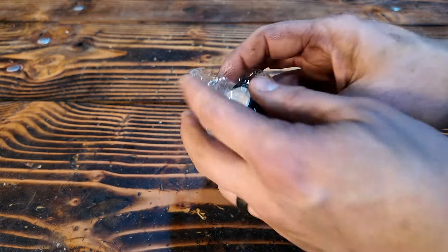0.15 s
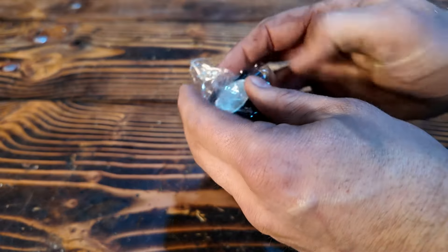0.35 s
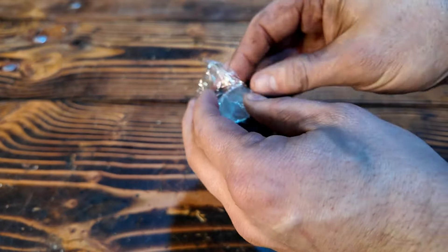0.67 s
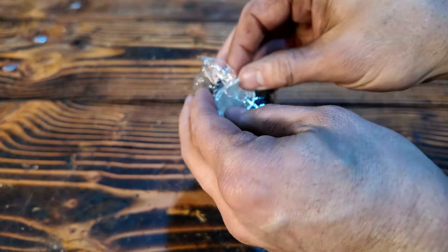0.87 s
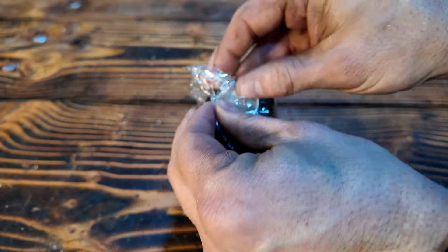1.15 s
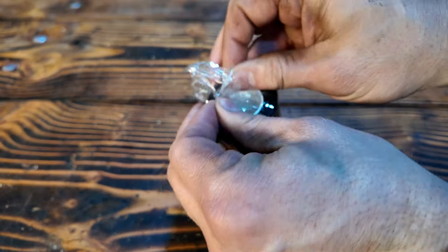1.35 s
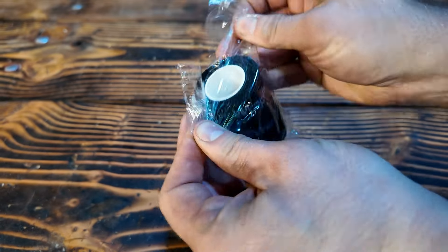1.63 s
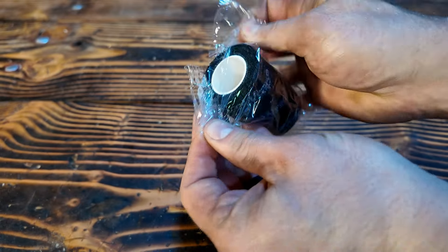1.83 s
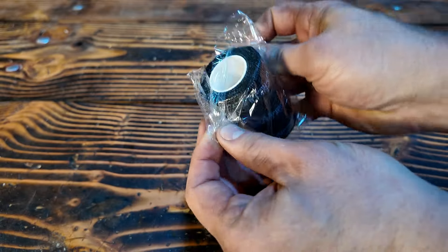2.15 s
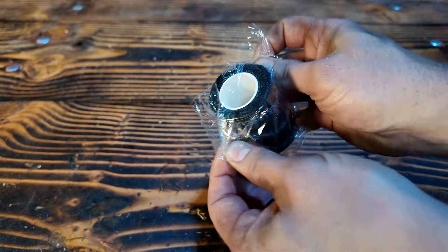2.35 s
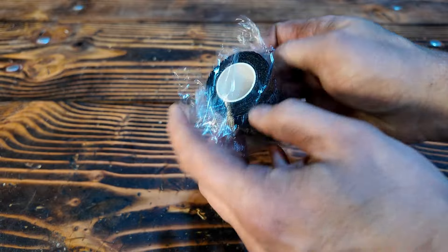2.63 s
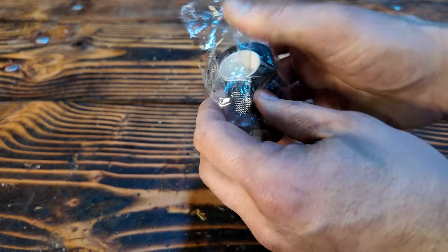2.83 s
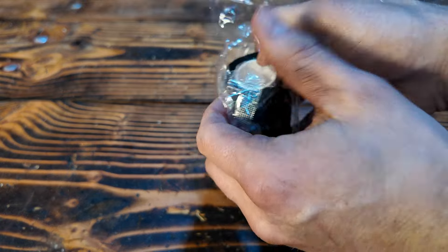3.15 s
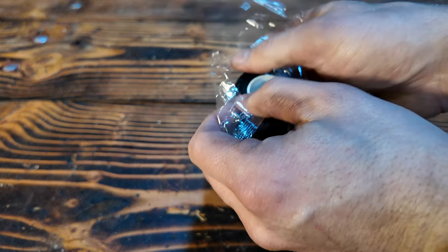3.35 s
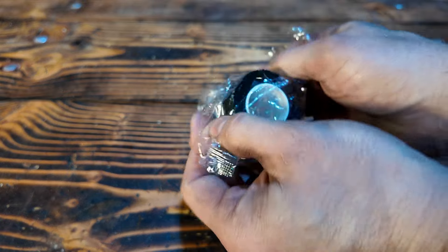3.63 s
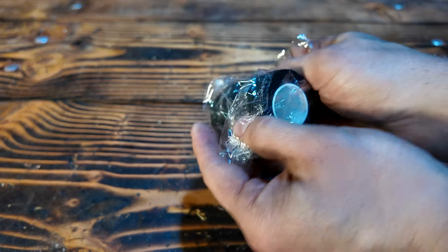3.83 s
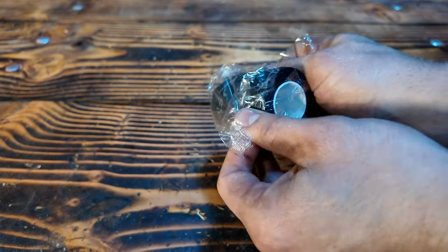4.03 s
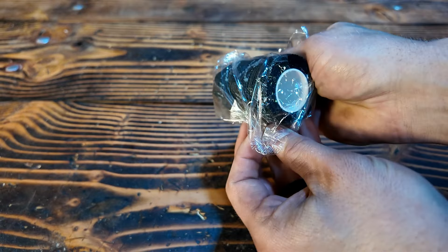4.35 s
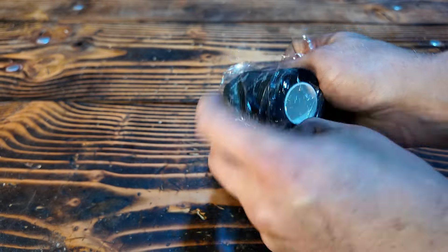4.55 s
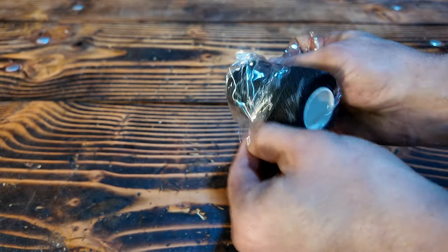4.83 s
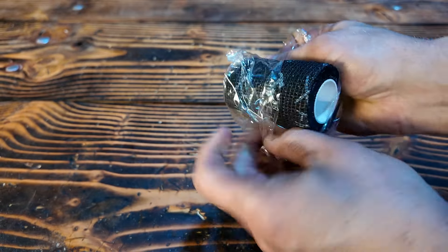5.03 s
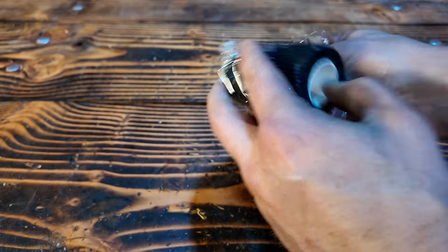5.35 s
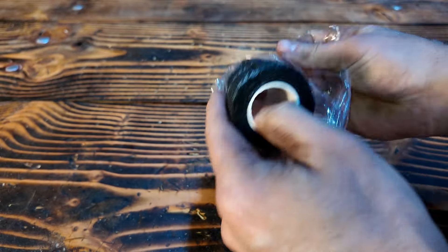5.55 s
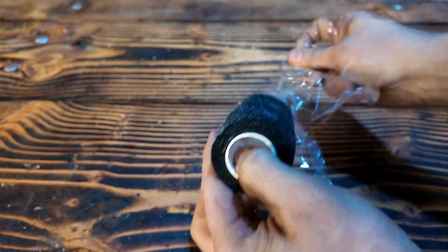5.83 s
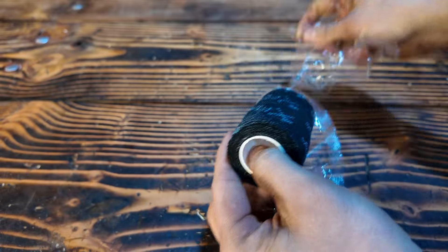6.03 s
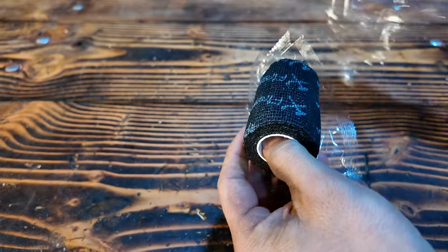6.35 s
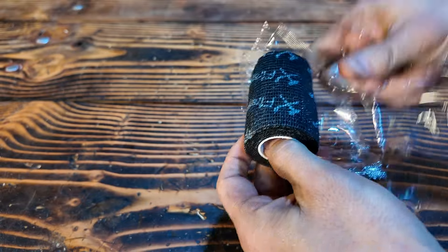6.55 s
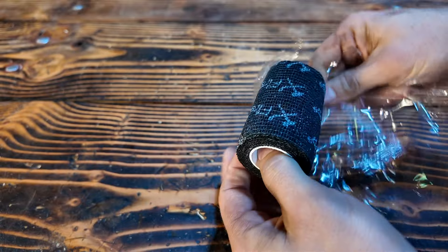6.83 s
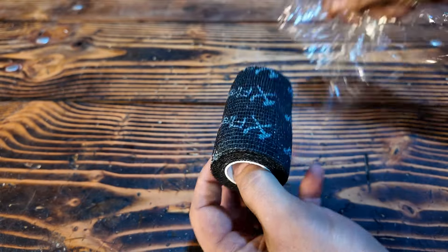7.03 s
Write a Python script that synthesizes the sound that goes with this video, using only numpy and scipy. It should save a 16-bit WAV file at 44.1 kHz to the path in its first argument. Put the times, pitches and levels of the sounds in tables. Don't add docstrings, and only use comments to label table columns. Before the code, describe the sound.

Very close stereo sound of fingers removing thin, stiff clear plastic from a small tape roll at a wooden table. From 0 to 1.4 seconds the open end is picked at: bright, dry ticks and short clustered crackles, with uneven gaps. Around 1.45 a much stronger crinkle breaks out with a brief rub, and loud snaps crowd together near 1.6 to 1.8. Peeling continues in smaller bursts until about 3.3, softening towards the end. From 3.6 to 5.6 crackling is livelier and brighter as film unwinds in repeated tugs. At 5.65 to 6.25 the sleeve pulls off with fuller, hollower crumples and faint low sliding friction. Afterwards light rustling and a few stronger crinkles near 6.7 to 6.9 drift right, dying away by 7.1. The room adds a short dull reverberation; quiet low ventilation rumble runs throughout.

```python
import sys
import numpy as np
from scipy import signal
from scipy.fft import rfft, irfft
from scipy.io import wavfile

SR = 44100
rng = np.random.default_rng(int(sys.argv[2]) if len(sys.argv) > 2 else 0)


def gain_from_decibels(decibels):
    exponent = np.asarray(decibels, float) / 20
    return 10 ** exponent


def pcm_store(signal):
    levels = np.round(np.clip(np.atleast_2d(signal), -1, 1) * 32767)
    wavfile.write(sys.argv[1], SR, levels.astype(np.int16).T)


N = 316715

# [t/s, peak level/dB, crease f/Hz]
CREASE_SNAPS = [(0.002, -23, 3360), (0.01, -37, 2760), (0.0153, -25.5, 7120), (0.027, -29, 1000),
                (0.0313, -32.5, 7610), (0.0461, -27, 7120), (0.0551, -27.5, 5430), (0.068, -35.5, 7120),
                (0.1003, -27, 2410), (0.1028, -23, 8150), (0.1154, -23, 4740), (0.1255, -26, 4140),
                (0.139, -25, 1140), (0.16, -22, 7120), (0.1706, -23, 1130), (0.1994, -30, 4740),
                (0.214, -28, 5430), (0.2215, -27, 3620), (0.2321, -30.5, 5810), (0.2425, -29, 8720),
                (0.2498, -16, 9330), (0.2617, -16, 2110), (0.2705, -27, 6220), (0.2844, -28, 4740),
                (0.3034, -29.0, 4430), (0.306, -23, 5430), (0.3185, -31, 5430), (0.3266, -22, 5430),
                (0.3354, -19, 4140), (0.3406, -17.5, 3870), (0.3623, -15.5, 4430), (0.397, -27, 4430),
                (0.4348, -21.5, 8150), (0.4399, -22, 3870), (0.457, -33.0, 1500), (0.472, -27.5, 4140),
                (0.4832, -27, 4140), (0.4929, -29, 1140), (0.5059, -36, 8720), (0.508, -34.5, 4140),
                (0.513, -35.0, 3380), (0.5207, -36, 4140), (0.5245, -37, 3380), (0.5408, -30, 3380),
                (0.5462, -28, 3620), (0.5514, -29, 4140),
                (0.5632, -29.5, 13080), (0.5758, -24, 6220), (0.5801, -23.5, 2110), (0.588, -25, 4740),
             (0.6068, -23, 1140), (0.6248, -29, 9330), (0.634, -16.5, 3870), (0.6439, -28, 1000),
             (0.667, -28, 9330), (0.7094, -23, 11430), (0.716, -27, 1230), (0.75, -32, 5070),
             (0.755, -32, 4430), (0.768, -31, 5070), (0.8027, -27, 1000), (0.807, -25, 2410),
             (0.822, -32.5, 2410), (0.8794, -26, 2250), (0.919, -37.0, 2250), (0.941, -32, 11430),
             (0.9506, -28, 3870), (0.9607, -33, 12230), (0.9749, -27, 9330), (1, -31.5, 3380),
             (1.013, -29, 3380), (1.0214, -28, 6650), (1.0328, -33, 6650), (1.0417, -25, 3380),
             (1.0865, -16.5, 4430), (1.0965, -27, 2250), (1.1105, -22.5, 10680), (1.1223, -23.0, 3870),
             (1.1276, -19, 3380), (1.1413, -18, 3380), (1.1893, -20, 1140), (1.2421, -15, 2110),
             (1.2465, -21.5, 5430), (1.2705, -24, 1140), (1.3061, -31, 4200), (1.3148, -19.0, 8100),
             (1.3197, -18.5, 9980), (1.3548, -16, 1140), (1.357, -31, 8720), (1.3868, -26.0, 9980),
             (1.397, -19, 8720), (1.407, -22, 5810),
                (1.463, -19, 9330), (1.4711, -24, 3620), (1.491, -20, 5430), (1.601, -16, 3870),
              (1.6153, -26, 8720), (1.6262, -16, 4430), (1.6312, -15.5, 6220), (1.6405, -15, 3580),
              (1.6524, -11, 2580), (1.6571, -13, 6220), (1.6826, -11, 4740), (1.7118, -15.5, 4740),
              (1.738, -15, 4430), (1.7626, -19.0, 7120), (1.7738, -24.5, 3870), (1.8298, -18.5, 2250),
              (1.8986, -29, 6650), (1.909, -33, 3620), (1.946, -27.5, 8665), (1.9483, -21, 5810),
              (1.958, -21, 4140), (1.9736, -26, 2580), (1.9981, -32, 6220), (2.038, -20, 2110),
              (2.0473, -21, 4740), (2.0773, -21.0, 4140), (2.0817, -20.5, 11430), (2.1373, -24, 3380),
              (2.1433, -19.5, 5070), (2.1812, -30, 3870), (2.1858, -33, 5070), (2.1913, -22, 4740),
              (2.236, -22, 1610), (2.2464, -27, 6220), (2.259, -20, 2950), (2.303, -25, 5070),
              (2.3151, -26.5, 5430), (2.3483, -20.5, 3620), (2.3568, -24, 6220), (2.3607, -22, 4430),
              (2.369, -26.0, 4740), (2.3788, -22, 5070), (2.41, -23, 4740), (2.4164, -25.5, 7120),
              (2.421, -25, 4740), (2.458, -25, 3620), (2.4788, -24.0, 3380), (2.493, -21.5, 5810),
                (2.5175, -31, 5430), (2.5639, -24, 4740), (2.5727, -28, 3160), (2.595, -25, 3160),
              (2.656, -34, 5070), (2.705, -24.5, 4430), (2.7108, -38, 4740), (2.7159, -20, 4140),
              (2.7212, -22, 3870), (2.8042, -24, 3620), (2.8459, -28, 4430), (2.8766, -25, 5070),
              (2.8918, -24, 1720), (2.9087, -28, 12230), (2.9853, -28.5, 5810), (2.9901, -27, 9330),
              (3.001, -21, 3870), (3.0326, -33, 3870), (3.0673, -26.0, 3870), (3.077, -28, 3870),
              (3.0964, -19, 5810), (3.1107, -26, 4430), (3.1377, -26, 5430), (3.158, -26, 5430),
              (3.1695, -35, 5060), (3.176, -30.5, 5810), (3.181, -27, 6650), (3.195, -31.0, 5430),
              (3.1985, -27, 6650), (3.2409, -34, 3620), (3.289, -38, 5430), (3.3023, -39, 10680),
              (3.3215, -39, 4430), (3.3488, -29, 4740), (3.3732, -27, 5070), (3.392, -25, 6220),
              (3.4095, -24, 3620), (3.463, -29, 8720), (3.4702, -28.5, 6650), (3.4762, -25, 3620),
              (3.502, -22, 13080), (3.523, -21, 13080),
                (3.587, -17.5, 3380), (3.5985, -19, 5810), (3.7169, -25, 9980), (3.724, -25, 4140),
                (3.7452, -24, 5070), (3.7679, -30, 4740), (3.7834, -24, 6650), (3.8195, -21, 5430),
                (3.8251, -22.0, 4740), (3.8338, -19, 5430), (3.8652, -20, 2110), (3.9054, -16.5, 3870),
                (3.9257, -22, 1840), (3.9478, -17, 5070), (3.9787, -22, 1970), (4.037, -17, 8720),
                (4.068, -16.5, 3620), (4.11, -28, 3620), (4.2047, -14, 3620), (4.246, -16, 2950),
                (4.2581, -24, 9330), (4.3084, -26.5, 8720), (4.3394, -20, 10680), (4.3491, -20, 6650),
                (4.376, -23.0, 6650), (4.394, -21, 4740), (4.4198, -19.5, 4430), (4.4407, -20, 2580),
                (4.4856, -24.0, 9330), (4.4947, -23, 6220), (4.5504, -22.0, 3620), (4.5738, -26, 4430),
                (4.5807, -26, 6650), (4.6402, -24.0, 7610), (4.687, -18, 4140), (4.7803, -17, 4740),
                (4.81, -25, 4740), (4.8218, -25, 11430), (4.838, -20, 11430), (4.867, -21.0, 3870),
                (4.88, -22.5, 1610), (4.9516, -21, 5430), (4.9779, -28, 5810), (5.0458, -21.0, 4430),
                (5.1043, -26, 5430), (5.2134, -23, 5070), (5.2454, -26, 10680), (5.2559, -29, 5070),
              (5.2646, -24, 2580), (5.274, -21, 1970), (5.2888, -22.5, 5430), (5.2975, -25, 2950),
              (5.3737, -28.0, 3160), (5.3987, -31, 6650), (5.4476, -18.5, 2950), (5.4808, -23.0, 6220),
              (5.5139, -20, 1610), (5.526, -20, 9980), (5.6407, -26, 5840), (5.65, -27, 2950),
              (5.6739, -30, 3256), (5.8296, -21, 1720), (5.901, -18, 3870), (6.0247, -20.5, 4140),
              (6.06, -21, 1720), (6.0715, -20, 1720), (6.081, -19, 5070), (6.0921, -18, 1230),
              (6.114, -17.0, 4140), (6.1798, -17.0, 3900),
                (6.2632, -32, 3160), (6.2884, -37.0, 2760), (6.3047, -35.0, 2760), (6.3088, -44, 5070),
               (6.35, -29, 2760), (6.357, -34, 5070), (6.373, -35.5, 2110), (6.3982, -29.5, 5430),
               (6.4038, -28, 4140), (6.4179, -32, 4740), (6.4298, -27, 2580), (6.4472, -25, 4430),
               (6.4516, -29, 2580), (6.4842, -36.5, 2110), (6.509, -36.5, 2110), (6.5162, -30, 2257),
               (6.5243, -32, 2260), (6.5321, -27, 5070), (6.5783, -48, 7120), (6.5948, -46, 2760),
               (6.6052, -41, 2580), (6.6737, -28, 4430), (6.6813, -39, 3160), (6.693, -34, 2580),
               (6.7124, -32.5, 2580), (6.7212, -24, 2250), (6.7305, -29, 2110), (6.76, -30.5, 2580),
               (6.7706, -34, 8720), (6.7885, -35, 4140), (6.8043, -27, 1970), (6.811, -27, 3400),
               (6.8393, -23, 1720), (6.8507, -17, 1840), (6.8828, -27, 1400), (6.9082, -31, 4430),
               (6.9143, -36, 2950), (6.9473, -26, 3620), (7.0353, -37.5, 9980), (7.0429, -32, 2580),
                (0.28, -19.5, 8200), (0.39, -19, 3600), (0.42, -21, 2800), (0.107, -26, 4500),
               (0.13, -26, 1100), (6.9, -27, 2500), (5.622, -26, 5300), (5.1, -23, 4000),
               (5.718, -18, 1600), (5.757, -22, 1800), (5.786, -20, 4500), (5.89, -18, 3700),
               (7.1, -22, 1800), (4.3, -30, 5000), (4.03, -20, 6900), (7.087, -35, 2600),
               (7.115, -32, 1500), (7.135, -42, 3000), (6.281, -37, 6000), (4.41, -29, 4000)]
# [t/s, peak level/dB, f/Hz]
PANEL_POPS = [(0.101, -29, 1150), (0.17, -28, 1080), (0.606, -33, 1280), (0.643, -25.5, 1030),
              (0.669, -34, 918), (1.095, -25.5, 2240), (1.128, -29, 1870), (1.497, -21, 2170),
              (1.647, -21.5, 790), (1.712, -27, 930), (1.827, -27, 2050), (2.036, -31.5, 2250),
              (2.235, -25.5, 1740), (3.596, -22, 1150), (3.819, -32, 1350), (3.925, -22.5, 1800),
              (4.105, -29, 665), (4.28, -29.5, 1800), (5.829, -17.5, 1770), (5.852, -21, 896)]
SNAP_DB, POP_DB = 13, 5.5


def snaps():
    creases = (CREASE_SNAPS)
    snap_s, snap_db, snap_hz = np.transpose(creases)
    pop_s, pop_db, pop_hz = np.transpose(PANEL_POPS)
    at = np.round(np.r_[snap_s, pop_s] * SR).astype(int)
    bright_db = snap_db + SNAP_DB - 6.5 + crease_colour(snap_hz, peak_db=6.5, octaves=0.45)
    bright_db = bright_db + parts_colour(at[:len(snap_s)])
    hollow_db = pop_db + POP_DB - 1.0 + crease_colour(pop_hz, peak_db=19.0, octaves=0.29)
    return film(at, np.c_[bright_db, hollow_db], shiver_ms=0.52, rise_ms=0.45, crack_db=2)


def crackle(per_s, spread_db, clump_db, shiver_ms, crowding, crack_db, extra):
    pull_db = tugs()[0]
    crowd_db = crowding * (pull_db + 42.5)
    rate = per_s * gain_from_decibels(2 * crowd_db + clump_db * drift(90))
    at = np.flatnonzero(rng.random(N) < rate / SR)
    size_db = spread_db * np.minimum(rng.exponential(1, N), 2.5)[at] - crowd_db[at]
    pitch_octaves = 0.72 * drift(10.7) + 1.26 * rng.standard_normal(N)
    pitch_hz = 3500 * 2 ** pitch_octaves[at]
    size_db = size_db + extra * (pull_db[at] + 30.0)
    colour_db = parts_colour(at) + crease_colour(pitch_hz, peak_db=15, octaves=0.55)
    buckles = film(at, pull_db[at] + size_db + colour_db, shiver_ms, rise_ms=0.26, crack_db=crack_db)
    return buckles / np.sqrt(per_s / SR * shiver_ms)


# [start t/s, hold t/s, crackle level/dB, body against the roll level/dB,
# large panels over fine creases level/dB]
PICKING = [(0.0, 0.09, -46, 1, 5.5), (0.103, 0.0073, -37, 0, 1), (0.231, 0.12, -37.5, 10.5, 0.5),
           (0.422, 0.27, -43.5, -9, 1.5), (0.619, 0.049, -37.5, -7, -4), (0.712, 0.01, -43, -7, 1.5),
           (0.814, 0.061, -44.5, -3.0, 3.5), (0.977, 0.11, -43.5, -11, 3.5),
           (1.074, 0.081, -36.5, -11, -0.5), (1.197, 0.11, -38.5, -5, 3), (1.305, 0.0046, -33, -9, 1),
           (1.335, 0.087, -39.5, -10, 0.5)]
TEARING = [(1.466,0.065,-26,5,3.5), (1.614,0.063,-29.5,-4,-0.5), (1.706,0.013,-33.5,-8,-0.5),
           (1.764,0.16,-36.5,10,-2), (1.896,0.0076,-37,-7,-1), (1.945,0.055,-36,-12,1),
           (2.033,0.058,-36,-14,-0.5), (2.126,0.105,-37,-3,-2.5), (2.228,0.034,-34,-18,2.5),
           (2.345,0.065,-41,-8,-2), (2.473,0.066,-38,2,0.5), (2.544,0.072,-35,-3.0,-1.5),
           (2.629,0.06,-45,7,-8), (2.712,0.076,-34.5,7,-3.5), (2.794,0.175,-40,15,1),
           (2.988,0.135,-36,6,-1.5), (3.152,0.048,-40,5.5,-6.5), (3.21,0.11,-47,2,-13)]
UNWINDING = [(3.319, 0.3, -38.5, 6.5, -1.0), (3.59, 0.096, -33.5, -7, -4.5), (3.697, 0.15, -40, 5, -1),
             (3.818, 0.042, -33, -0.5, -1.5), (3.887, 0.099, -36.5, -3, -4), (4.042, 0.25, -32, 4.5, -4),
             (4.259, 0.12, -36.5, -31, -5.5), (4.431, 0.13, -37, -8, -4), (4.539, 0.039, -33, -6, -2.5),
             (4.595, 0.063, -36, 7.5, 0), (4.691, 0.15, -31.5, -14, -7), (4.863, 0.12, -34.5, -38, -6),
             (5.045, 0.0067, -33.5, -28, -2), (5.111, 0.077, -33, -6, -2.5), (5.244, 0.056, -32.5, -2, -1),
             (5.308, 0.17, -37, -1, 1.5), (5.432, 0.14, -34.5, 2, 0)]
PULLING_OFF = [(5.65, 0.1, -33.5, 3, 1.5), (5.715, .06, -30, 3, 4), (5.78, 0.054, -29.5, 8, 2.5),
               (5.85, 0.065, -31, 10.5, 3.5), (5.915, 0.075, -33.5, 3, 4), (6.016, .03, -40, -13, 6),
               (6.055, 0.026, -34.5, -17, 9), (6.087, 0.11, -30.5, -6, 8), (6.2, 0.036, -35, 4, 6),
               (6.291, .239, -45.5, -3, 0), (6.675, 0.058, -42, 5, 4.5), (6.765, 0.074, -40, 11, 4.5),
               (6.834, 0.017, -33.5, 6, 8.5), (6.869, 0.093, -40.5, 15.5, 7.5), (6.98, .155, -47, -12, -6)]
# [t/s, crackle level/dB]
SETTLING = [(0, -49.5), (7.13, -56.5), (7.142, -66)]
ATTACK_DB_PER_S, RELEASE_DB_PER_S = 787, 410.5
BODY_DB, PANELS_DB, CREASES_DB, PANEL_SHARE = -3.5, -3.5, 0.47, 0.62


def tugs():
    t = np.arange(0, N + 64, 64) / SR
    events = np.transpose(PICKING + TEARING + UNWINDING + PULLING_OFF)
    start, hold, db, body_db, size_db = events[:, :, None]
    rise_db = ATTACK_DB_PER_S * np.maximum(start - t, 0)
    fall_db = RELEASE_DB_PER_S * np.maximum(t - start - hold, 0)
    each_db = db - rise_db - fall_db
    strongest = each_db.argmax(axis=0)
    rows = np.c_[t, each_db.max(axis=0), body_db[strongest], size_db[strongest]]
    pull_db, body_db, size_db = in_time(rows)
    body = BODY_DB + body_db
    panels = PANELS_DB + PANEL_SHARE * size_db
    creases = CREASES_DB - (1 - PANEL_SHARE) * size_db
    return np.maximum(pull_db, in_time(SETTLING)[0]), np.array([body, panels, creases])


def parts_colour(at):
    centre_hz, octaves = [290, 1200, 13000], [0.6, 0.8, 0.7]
    share = np.exp(-0.5 * (np.log2(BANDS_HZ[:, None] / centre_hz) / octaves) ** 2)
    return share @ tugs()[1][:, at]


# [start t/s, end t/s, f/Hz, level/dB]
RUBS = [
    (1.441, 1.487, 6100, -38),
    (1.525, 1.6, 580, -31),
    (6.277, 6.54, 2390, -57),
    (5.72, 5.83, 3800, -51),
    (6.09, 6.25, 1560, -43.5),
    (6.4, 7.07, 8000, -57),
    (6.084, 6.243, 288, -35.5),
]


def rubs():
    t = np.arange(N) / SR
    slips = rng.random(N) < 800 * gain_from_decibels(2.2 * drift(45)) / SR
    at, db_by_band = [], []
    for start, end, hz, db in RUBS:
        here = np.flatnonzero(slips & (t > start) & (t < end))
        patch_db = db + crease_colour(hz, peak_db=25.0, octaves=0.16)
        at.append(here)
        db_by_band.append(np.repeat(patch_db, len(here), axis=1))
    return film(np.concatenate(at), np.hstack(db_by_band), shiver_ms=0.73, rise_ms=0.12, crack_db=-16)


# [f/Hz, level/dB]
FILM_SPECTRUM = [(230, -15), (450, -9), (780, -1.5), (2900, -4), (4400, -1.5), (7600, -6), (9800, -3),
                 (15000, -8)]
BANDS_HZ = np.geomspace(210, 15600, num=17)
LEAD_CYCLES = 1.6


def film(at, db_by_band, shiver_ms, rise_ms, crack_db):
    out, white = 0, rng.standard_normal((2, 2, N))
    for k, hz in enumerate(BANDS_HZ):
        begin = np.maximum(at - int(LEAD_CYCLES * SR / hz), 0)
        kicks = np.bincount(begin, gain_from_decibels(db_by_band[k]), N)[:N] + 1e-18
        times_ms = np.array([shiver_ms, rise_ms]) * (4000 / hz) ** 0.17
        fall, rise = np.exp(-1000 / (SR * times_ms))
        swell = signal.lfilter([1 - rise], np.convolve([1, -fall], [1, -rise]), kicks)
        mid, side = white[k % 2] * swell
        mid = mid + gain_from_decibels(crack_db) * kicks * (-1) ** k
        out = out + gain_from_decibels(at_hz(FILM_SPECTRUM, hz)) * band(stereo(mid, side, hz), hz)
    return out


def crease_colour(pitch_hz, peak_db, octaves):
    return peak_db * np.exp(-0.5 * (np.log2(BANDS_HZ[:, None] / pitch_hz) / octaves) ** 2)


def band(x, hz):
    sos = signal.butter(2, [hz / 1.145, hz * 1.145], "band", fs=SR, output="sos")
    return signal.sosfilt(sos, x)


# [f/Hz, side re mid level/dB]
WIDTH = [(60, -21), (110, -36), (200, -17), (380, -16), (700, -12.5), (1290, -15), (2380, -15), (4400, -10),
         (8120, -5), (15000, -2)]


def stereo(mid, side, hz):
    return mid + gain_from_decibels(at_hz(WIDTH, hz)) * side * np.array([[1], [-1]])


# [t/s, left over right level/dB, samples by which left leads]
PLACE = [
    (0, 0.3, 0.13),
    (5, 0.5, 0.07),
    (6.2, -1, -0.3),
    (7.18, -2.5, -1.7),
]


def at_bearing(x):
    pan_db, lead = in_time(PLACE)
    x = x + np.outer([0.5, -0.5], lead * np.gradient(x.mean(axis=0)))
    return x * gain_from_decibels(np.outer([0.5, -0.5], pan_db))


def table_and_walls(x, t60_s):
    t = np.arange(SR // 4) / SR
    tail = rng.standard_normal((2, len(t))) * gain_from_decibels(-60 * t / t60_s) * (t > 0.002)
    tail = signal.lfilter([0.5], [1, -0.5], tail)
    tail = tail / np.sqrt(np.sum(tail ** 2, axis=1, keepdims=True))
    return signal.fftconvolve(x, tail, axes=1)[:, :N]


# [f/Hz, level/dB]
RUMBLE_SPECTRUM = [(20, -39), (36, -38), (50, -19), (75, -6.5), (100, -11), (120, -5.5), (150, -12.5),
                   (230, -22), (400, -36), (1000, -33.5), (5000, -35), (16000, -58)]
RUMBLE_DB = -53


def ventilation():
    hz = np.maximum(np.arange(N // 2 + 1) * SR / N, 10)
    mid, side = rfft(rng.standard_normal((2, N))) * gain_from_decibels(at_hz(RUMBLE_SPECTRUM, hz))
    air = rms_one(irfft(stereo(mid, side, hz), N))
    return gain_from_decibels(RUMBLE_DB + 1.7 * drift(0.48)) * air


def in_time(rows):
    s, *columns = np.transpose(rows)
    return [np.interp(np.arange(N) / SR, s, c) for c in columns]


def at_hz(points, hz):
    f, db = np.transpose(points)
    return np.interp(np.log(hz), np.log(f), db)


def rms_one(x):
    return x / np.sqrt(np.mean(x ** 2) + 1e-20)


def drift(rate):
    r = np.exp(-40 * np.pi * rate / SR)
    noise = rng.standard_normal(N // 20 + 2002)
    slow = signal.lfilter([1], [1, -2 * r, r * r], noise)[2000:]
    return np.interp(np.arange(N) / 20, np.arange(len(slow)), rms_one(slow))


TICKS_END_S = 6.97
ROOM_T60_S = 0.1


def scene():
    ticks = gain_from_decibels(-35) * crackle(per_s=110, spread_db=4.5, clump_db=2.5, shiver_ms=0.9,
                               crowding=0.074, crack_db=1.0, extra=-0.2)
    coarse = gain_from_decibels(-26.0) * crackle(per_s=350, spread_db=3.5, clump_db=1.5, shiver_ms=0.48,
                                  crowding=0.28, crack_db=-4, extra=0)
    rustle = gain_from_decibels(-31) * crackle(per_s=1500, spread_db=6.0, clump_db=3.5, shiver_ms=0.64,
                                crowding=0.38, crack_db=-5, extra=0.12)
    ticking = np.arange(N) < TICKS_END_S * SR
    wrapper = at_bearing(snaps() + (ticks + coarse) * ticking + rustle + rubs())
    return wrapper + gain_from_decibels(-18.0) * table_and_walls(wrapper, ROOM_T60_S) + ventilation()


def roll_off(x):
    return signal.sosfilt(signal.butter(12, 16820, fs=SR, output="sos"), x)


def record(dry):
    low_pass = signal.ellip(7, 0.5, 28, 15750, fs=SR, output="sos")
    mix = signal.sosfilt(low_pass, dry)
    return roll_off(mix)


dry = scene()
out = record(dry)
pcm_store(out)
```